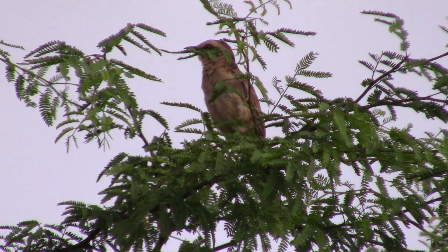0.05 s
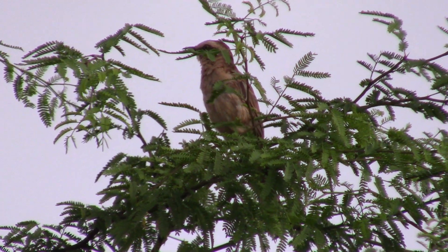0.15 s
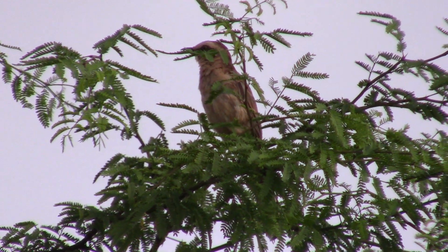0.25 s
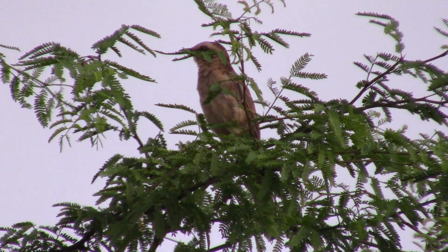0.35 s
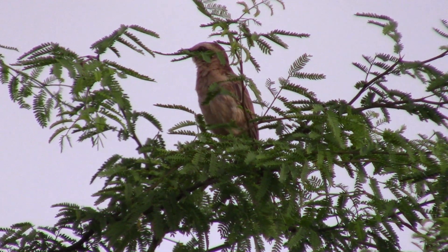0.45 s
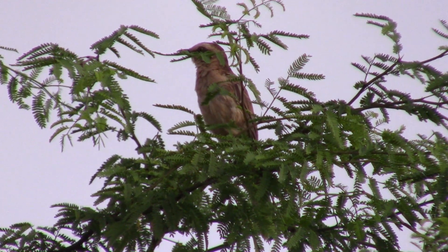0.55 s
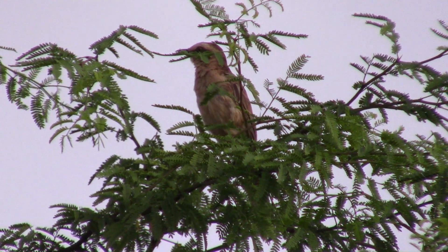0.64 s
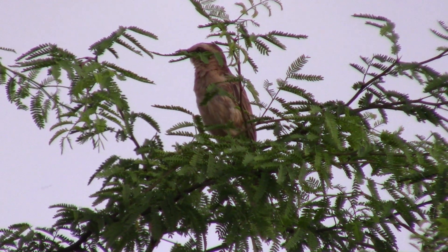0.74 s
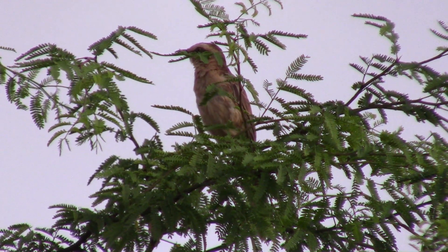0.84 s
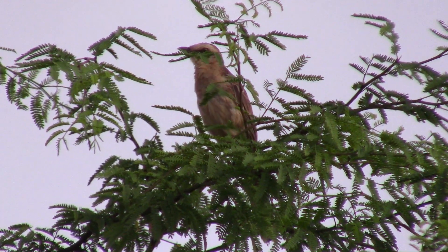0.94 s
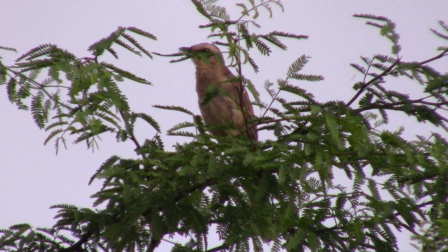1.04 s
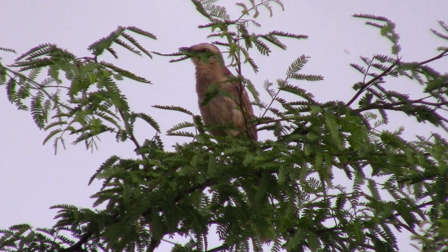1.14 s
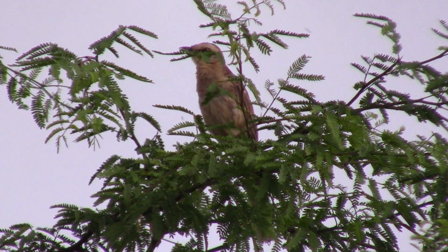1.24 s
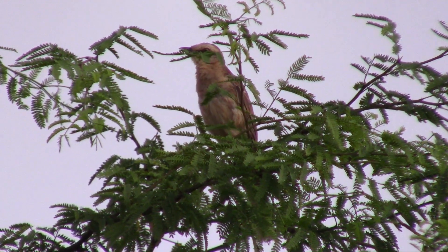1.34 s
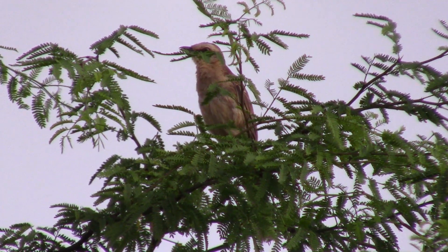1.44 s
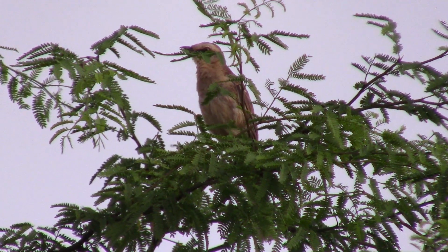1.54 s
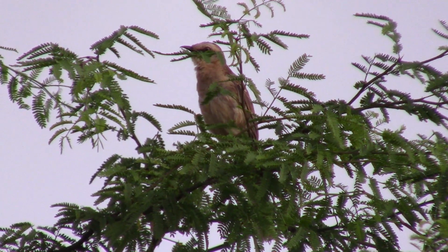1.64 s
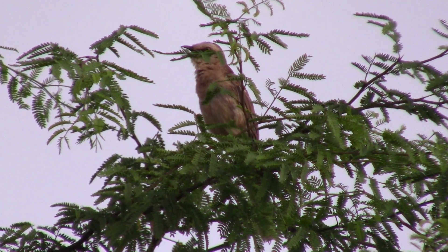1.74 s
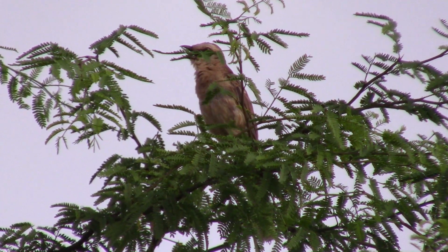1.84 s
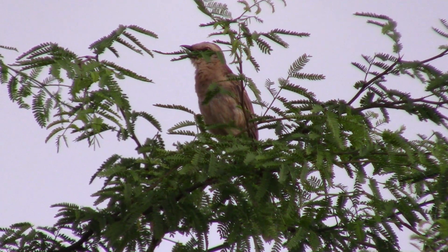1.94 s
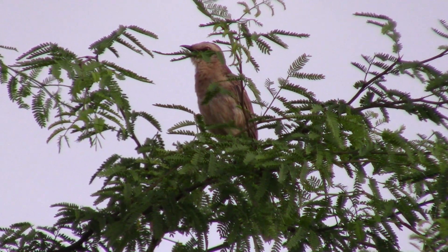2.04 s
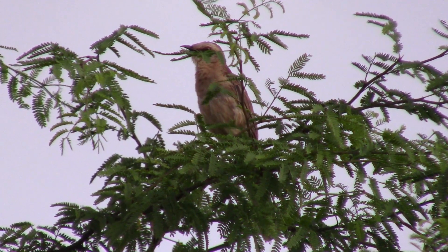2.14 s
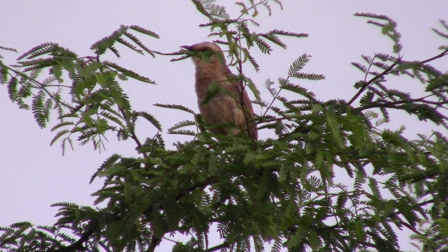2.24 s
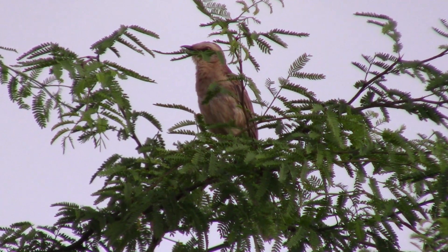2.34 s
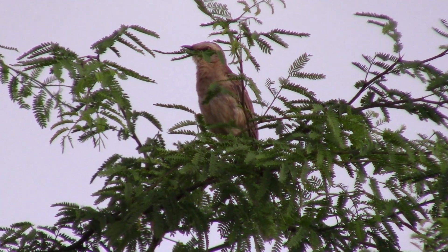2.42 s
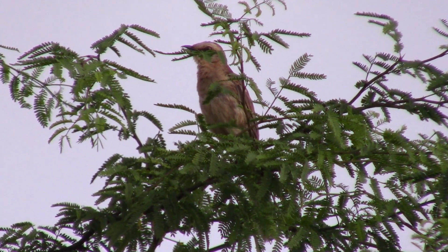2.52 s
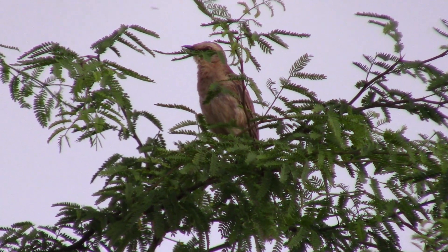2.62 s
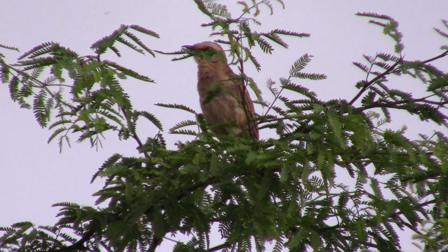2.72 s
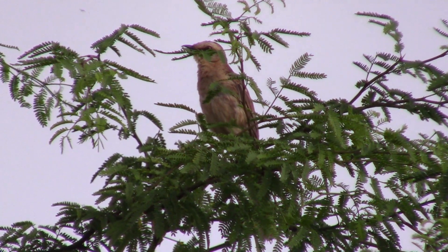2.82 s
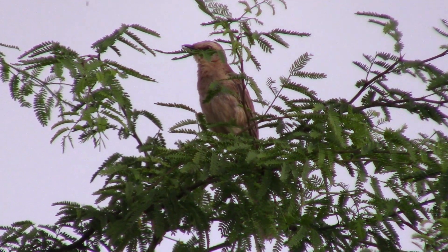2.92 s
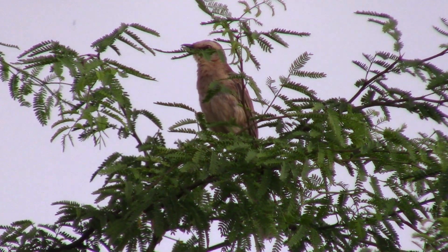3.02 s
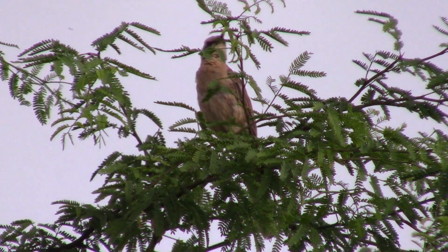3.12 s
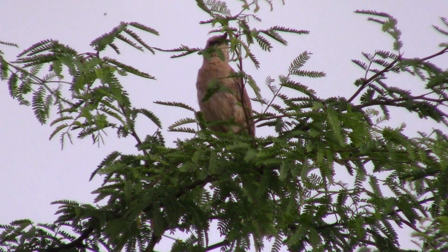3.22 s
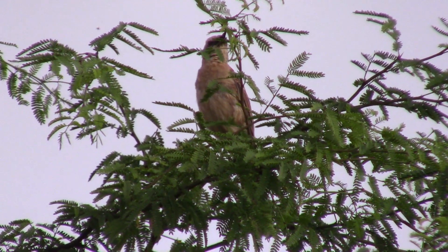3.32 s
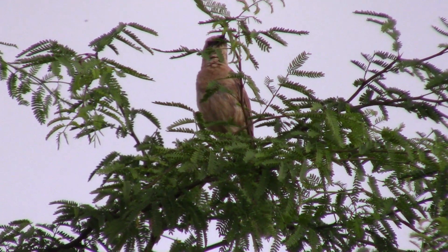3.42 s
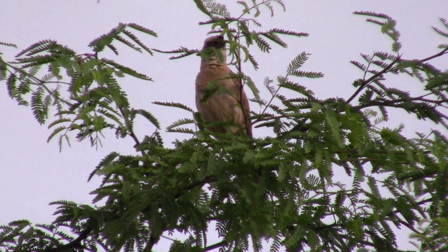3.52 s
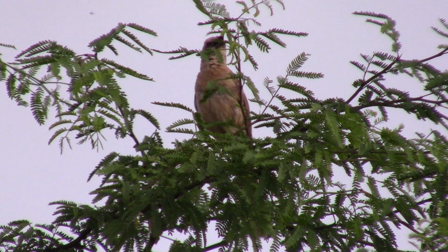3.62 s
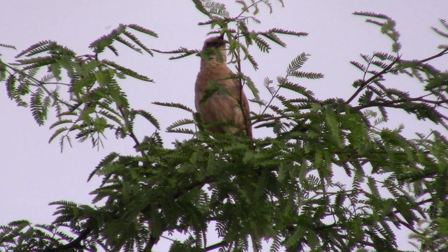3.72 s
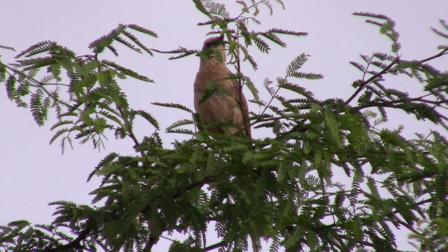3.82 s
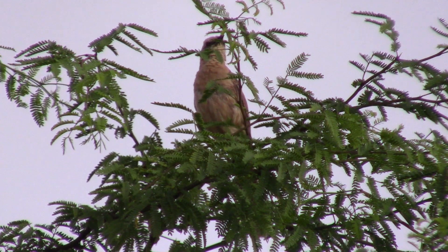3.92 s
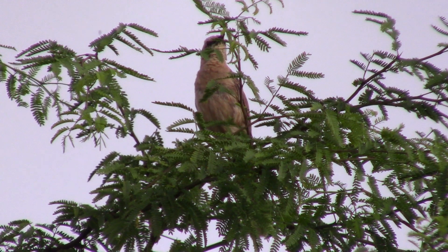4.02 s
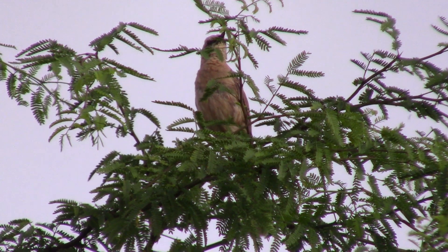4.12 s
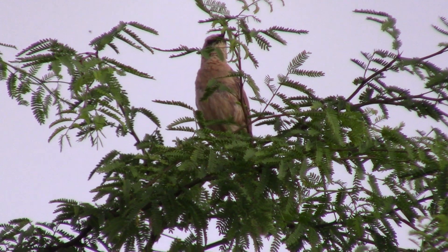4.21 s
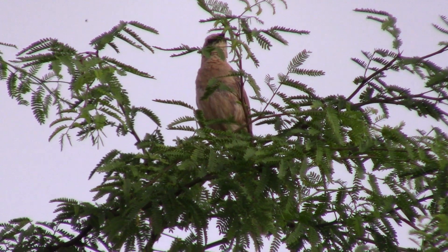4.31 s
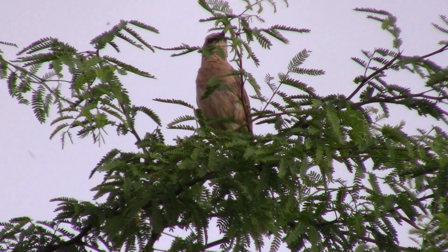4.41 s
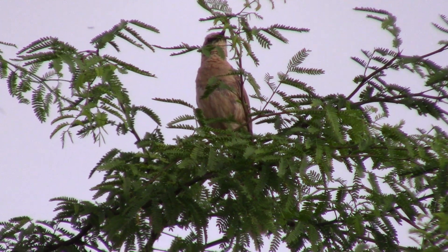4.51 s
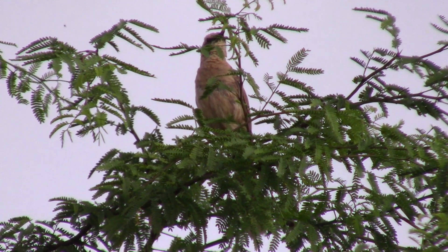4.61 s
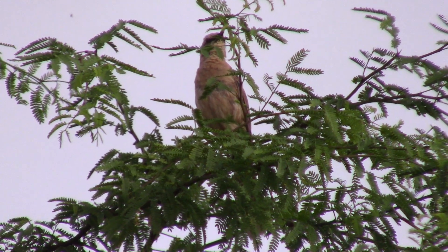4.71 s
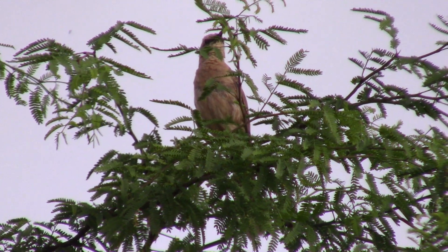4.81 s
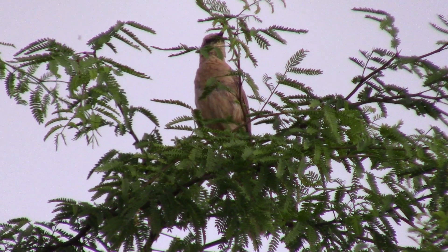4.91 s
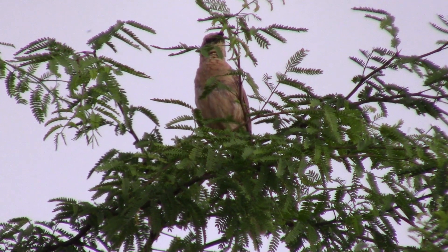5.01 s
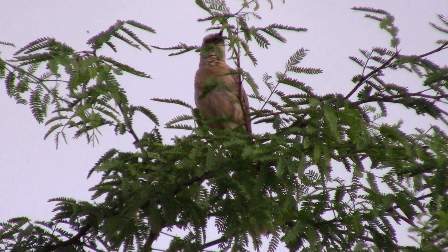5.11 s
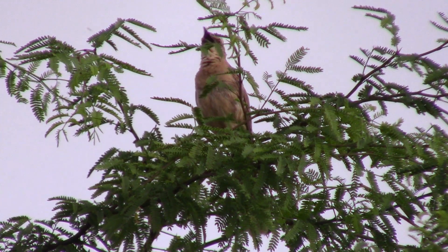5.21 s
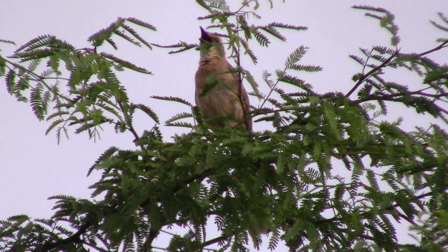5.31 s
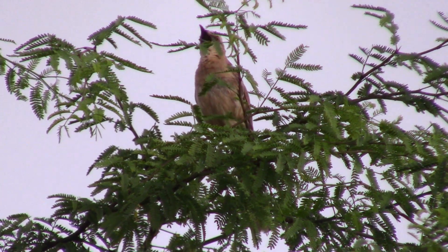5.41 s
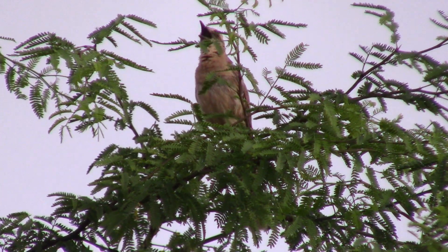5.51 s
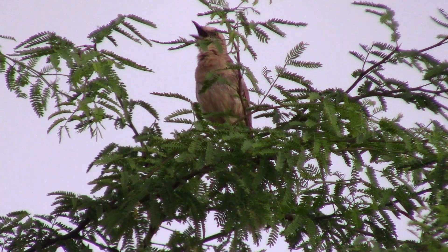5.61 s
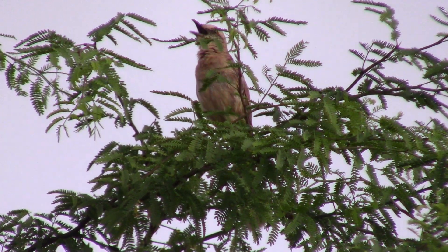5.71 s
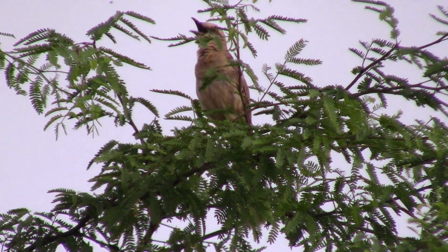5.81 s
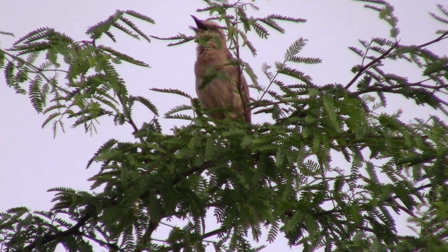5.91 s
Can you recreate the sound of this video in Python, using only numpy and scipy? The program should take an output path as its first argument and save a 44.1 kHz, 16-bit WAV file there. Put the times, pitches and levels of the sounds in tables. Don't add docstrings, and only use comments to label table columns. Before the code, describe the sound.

A songbird close by gives three loud chup-buzz calls with pauses, then breaks into a fast rattle, over faint distant birds, doves and a cricket.

```python
import sys
import numpy as np
from scipy import signal
from scipy.fft import rfft, irfft, next_fast_len
from scipy.io import wavfile
from scipy.ndimage import uniform_filter1d

SR = 44100
rng = np.random.default_rng(int(sys.argv[2]) if len(sys.argv) > 2 else 0)


def boost(x):
    u = np.asarray(x, float) / 20
    return 10 ** u


def output_pcm(signal):
    pcm = np.clip(np.atleast_2d(signal).T, -1, 1) * 32767
    wavfile.write(sys.argv[1], SR, np.round(pcm).astype(np.int16))


N = 262395
T = np.arange(N) / SR

# (frequency [Hz], level per Hz [dB])
AIR_TONE = [(20, -41), (40, -12), (60, -5), (85, -3.5), (125, -3), (250, -0.5), (600, -0.5), (1000, -5),
            (2000, -9), (3500, -9), (5000, -16), (7000, -21.5), (10000, -24.5), (16000, -33.5)]
# (frequency [Hz], side minus middle [dB])
AIR_SIDE = [(30, -12), (300, -8.5), (1500, -10), (6000, -13), (14000, -12)]
AIR_DB = -59.5
# (time [s], pitch [Hz], level [dB])
WIND_PUFFS = [
    (4.411, 111, -65),
    (4.661, 95, -64),
    (4.715, 73, -65),
]

# (from [s], to [s], level [dB], swell [s], fade [s])
RUSTLE = [
    (.9, 1.35, -88, 0.13, 0.072),
    (1.95, 2.1, -80, .1, 0.16),
    (3.17, 3.44, -59, 0.18, 0.028),
    (4.05, 4.15, -77, 0.28, .1),
    (5.28, 5.38, -59.5, 0.083, 0.22),
]
# (from [s], to [s], level [dB], swell [s], fade [s])
CHATTER = [
    (-.1, .05, -73, .1, .2),
    (1.2, 1.3, -63.5, 0.36, 0.24),
    (1.8, 2.0, -75, 0.17, 0.27),
    (3.4, 4.55, -66.5, 0.8, 0.1),
]
# (from [s], to [s], level [dB], swell [s], fade [s])
EARLIER_CALL = [
    (-.1, 0.022, -56, .1, 0.38),
]
RUSTLE_REST_DB, CHATTER_REST_DB = -71, -69

# (from [s], to [s], level [dB], swell [s], fade [s])
CRICKET_BOUTS = [
    (-.1, 1.84, -65.5, 0.094, .06),
    (3.12, 3.18, -81, 0.067, .08),
    (4.6, 6.1, -65.5, .35, .1),
]
CRICKET_HZ, CRICKET_RATE_HZ, CRICKET_DB, CRICKET_REST_DB = 4206, 40.2, -1.5, -108

# (time [s], length [s], from [Hz], to [Hz], level [dB])
GLIDES = [(.259, 0.024, 2420, 2020, -52), (.63, 0.031, 2390, 1820, -52), (1.017, 0.016, 2740, 2000, -43.5),
          (4.197, .032, 2370, 2080, -63), (4.554, 0.019, 2420, 2240, -48),
          (4.828, 0.027, 3030, 2310, -44.5), (5.073, 0.023, 3000, 2240, -42),
          (.766, 0.051, 3500, 3240, -57), (2.277, 0.057, 3450, 3700, -59.5), (2.278, .03, 6700, 7050, -63),
          (2.35, 0.055, 6850, 7000, -75), (2.36, .08, 7500, 7350, -79), (3.793, 0.026, 3870, 3780, -57),
          (.255, 0.025, 5350, 4840, -72), (.312, .025, 5200, 4900, -85), (.098, 0.6, 1306, 1433, -71),
          (.551, 0.6, 1486, 1413, -70.5)]
# (time [s], level [dB])
TSIPS = [
    (2.101, -60),
    (2.155, -60),
    (2.805, -61),
    (2.838, -63),
    (2.875, -62),
    (2.917, -61),
    (2.966, -63),
    (4.09, -67),
    (4.135, -68),
]
# (length [s], from [Hz], to [Hz])
TSIP_SHAPE = (0.0187, 5700, 6450)
# (time [s], pitch [Hz], level [dB])
TICKS = [(.36, 4720, -66), (.672, 5520, -67), (.761, 7800, -66), (.825, 5420, -62), (.974, 4670, -58),
         (2.015, 5810, -66), (2.06, 5770, -63), (2.34, 5200, -70), (2.357, 7500, -66), (2.42, 7550, -68),
         (2.507, 7450, -73), (2.565, 6900, -68), (2.568, 7450, -75), (2.716, 5780, -58.5),
         (2.742, 5770, -64), (2.76, 5900, -63), (2.778, 6200, -66), (2.996, 5960, -60), (3.11, 5840, -74),
         (5.005, 5500, -74), (5.05, 5580, -70)]
TICK_S = 0.016
# (time [s], peak level [dB])
TSEWS = [(0.711, -52), (0.7647, -52), (1.2344, -65), (1.288, -64), (1.4107, -52.5), (1.465, -53.5),
         (2.2043, -52.5), (2.2518, -52.5), (2.412, -65), (2.4596, -60.5), (3.0044, -56), (3.0546, -53.5),
         (3.88, -53), (3.934, -52.5), (4.3021, -65), (4.356, -61), (4.717, -52.5), (4.7697, -53.5),
         (4.894, -61), (4.9442, -62), (5.0858, -68), (5.1398, -68), (5.496, -65), (5.546, -68)]
# (length [s], from [Hz], to [Hz])
TSEW_SHAPE = (0.026, 5470, 5000)
# (time [s], length [s], pitch [Hz], level [dB])
REELS = [
    (1.3, 0.1, 3940, -64.5),
    (2.933, .12, 4000, -65),
    (4.805, 0.088, 4020, -64),
]
# (time from its start [s], pitch [Hz], level [dB])
WARBLE_SHAPE = [
    (-.02, 3187, -8),
    (.001, 4386, 1),
    (.018, 4540, -4),
    (.022, 3800, 4.5),
    (.042, 2950, 3),
    (.062, 3927, -3),
    (.088, 2450, -8),
    (.13, 3580, -17),
    (.165, 2650, -4),
]
# (time [s], level [dB])
WARBLES = [
    (1.107, -55),
    (3.016, -54),
    (4.552, -55),
]
# (time [s], length [s], level [dB], pitch [Hz])
COOS = [
    (2.97, 0.08, -52, 498),
    (3.603, 0.17, -50, 517.5),
    (4.01, 0.11, -51.5, 535.6),
    (4.259, 0.11, -53, 523.7),
    (4.667, 0.21, -50.5, 521.4),
    (5.371, 0.094, -52.5, 506.5),
]
# (time [s], length [s], level [dB], pitch [Hz])
HOOTS = [(0.512, 0.22, -60, 745), (0.771, .22, -61, 735), (.92, 0.058, -57, 640), (1.05, 0.065, -62, 595),
         (1.1, 0.21, -65, 725), (1.26, 0.25, -65.5, 690), (2.36, 0.11, -64, 625), (3.02, 0.11, -63, 630),
         (3.62, 0.11, -61, 630), (3.81, 0.094, -64.5, 735), (4.29, 0.097, -62, 615), (4.54, 0.22, -66, 712),
         (.11, 0.11, -63.5, 1195), (.59, .19, -63, 1185), (.82, .08, -72, 1175), (.95, .07, -64.5, 1180),
         (1.07, 0.069, -64.5, 1180), (1.22, 0.075, -69, 1185), (1.95, .17, -65.5, 1215),
         (2.21, .09, -68, 1170), (2.3, 0.15, -66, 1245), (2.57, 0.072, -63, 1170)]
SCOOP_S, SCOOP_HZ, SCOOP_DB, SAG, FADE_DB = 0.025, 65, -3, .965, -8
AFTER_GAP_S, AFTER_S, AFTER_DB = .012, 0.125, -12

# (time of top pitch [s], top pitch [Hz], level [dB])
CHUPS = [
    (1.785, 2649, -19.5),
    (3.4965, 2630, -20),
    (5.188, 2612, -18.5),
]
CHUP_RISE_S, CHUP_FALL_S, CHUP_LEAD_S = .009, .0042, .042
# (time of top pitch [s], top pitch [Hz], rise [s], voice starts before the top [s], level [dB])
RATTLE = [
    (5.637, 2911, .0055, .0065, -18.5),
    (5.676, 3022, .0045, 0.022, -19.5),
    (5.713, 3076, .004, 0.00615, -19),
    (5.757, 3208, 0.0087, .005, -20),
    (5.801, 3171, 0.01497, .006, -20.5),
    (5.844, 3170, 0.014, .006, -21),
    (5.885, 3184, 0.0154, .006, -20),
    (5.927, 3305, 0.01417, .006, -20),
]
RATTLE_FALL_S, FIRST_FALL_S, SETTLE_S = 0.0081, .015, .08
CHUP_SLACK_HZ, RATTLE_SLACK_HZ = 648, 1057
# (time [s], pitch [Hz], level [dB])
OPENING = [
    (5.561, 1272, -43),
    (5.57, 1387, -24),
    (5.587, 2308, -18.5),
    (5.594, 2635, -18.5),
    (5.601, 2882, -17),
    (5.61, 2548, -15),
    (5.618, 1897, -27.5),
    (5.627, 1584, -17),
]
# (start [s], length [s], top pitch [Hz], top at this share of the length, pointedness)
ARCHES = [
    (1.813, 0.16, 2565, .375, 1.2),
    (3.528, 0.15, 2285, .47, 0.79),
    (5.213, .169, 2288, .37, .8),
]
ARCH_FOOT_HZ, ARCH_DB_PER_OCTAVE, ARCH_ATTACK_S, ARCH_RELEASE_S = 1370, 10, 0.0056, 0.026
# (time of one loud beat [s], rate there [Hz], slowing [Hz per s], level [dB])
FLUTTERS = [
    (1.875, 116.3, 328, -19.5),
    (3.597, 112.4, 239, -19),
    (5.273, 109.7, 324.4, -19.5),
]
FLUTTER_DEPTH, FLUTTER_DB, FLUTTER_LEAD = .082, 5.5, 0.173
SLACK_FLUTTER = 1.5
HARMONIC_DB = [1, -4, -10, -14, -16.5, -20.5, -13, -16, -21.5, -36, -45, -48, -51]
SOFT_DB = 2.6
TURNS_S, ASIDE_SOFT = 3.2, .3
# (frequency [Hz], level [dB])
THROAT = [(800, -63), (1400, -27), (1900, -17.5), (2400, 0.5), (3100, -1.5), (3900, -18), (4800, -28),
          (5800, -24.5), (7000, -18), (8500, -18.5), (9800, -31), (11500, -16), (13300, -31), (15200, -30)]
# (delay [s], level [dB], side from -1 to 1)
ECHOES = [
    (.001, -23.5, -0.27),
    (.0018, -25, 0.53),
    (.0043, -7.5, -0.1),
    (.0061, -16.5, -.2),
    (.0098, -17.5, 0.046),
]
# (delay [s], time to fade 60 dB [s], level [dB])
TAILS = [
    (.008, 0.18, -15),
    (0.03, 0.41, -23),
    (0.163, 1.113, -30.5),
]


def colour(x, points):
    hz, db = np.transpose(points)
    n = next_fast_len(N + SR // 10)
    f = np.arange(n // 2 + 1) * SR / n + 1
    gain = boost(np.interp(np.log(f), np.log(hz), db))
    return irfft(rfft(x, n) * gain, n)[..., :N]


def unit(x):
    return x / np.sqrt(np.mean(x ** 2))


def walk(rate):
    hold = int(SR / rate)
    steps = np.repeat(rng.standard_normal(N // hold + 1), hold)
    smooth = uniform_filter1d(uniform_filter1d(steps, hold), hold)
    return unit(smooth[:N])


def sides(x, pan_db):
    return x * boost(np.array([[pan_db / 2], [-pan_db / 2]]))


def bouts(rows, rest_db):
    gain = boost(rest_db)
    for start, end, db, swell, fade in rows:
        before, after = np.maximum(start - T, 0), np.maximum(T - end, 0)
        gain = gain + boost(db) * np.exp(-before / swell - after / fade)
    return gain


def add_whistle(out, rows, pan_db=0., throb_hz=0.):
    s, hz, db = np.transpose(rows)
    i = slice(int(s[0] * SR), int(s[-1] * SR))
    t = T[i]
    ends = np.clip(np.minimum(t - s[0], s[-1] - t) / min(.006, (s[-1] - s[0]) / 3), 0, 1)
    throb = 1 + 0.55 * np.sin(2 * np.pi * throb_hz * (t - s[0]))
    tone = np.sin(2 * np.pi * np.cumsum(np.interp(t, s, hz)) / SR)
    loudness = np.sqrt(2) * ends * throb * boost(np.interp(t, s, db))
    out[:, i] += sides(loudness * tone, pan_db)


def tail(late, t60, db):
    t = T[:int(1.5 * SR)]
    h = rng.standard_normal((2, len(t))) * boost(-60 * t / t60) * np.clip(t / late - 1, 0, 1)
    h = h[0] + 0.14 * h[1] * np.array([[1], [-1]])
    return h * boost(db) / np.sqrt(np.sum(h ** 2) / 2)


def air():
    mid = colour(rng.standard_normal(N), AIR_TONE)
    side = colour(colour(rng.standard_normal(N), AIR_TONE), AIR_SIDE)
    pair = (mid + side * np.array([[1], [-1]])) / np.sqrt(np.mean(mid ** 2))
    hum = colour(pair, [(350, 12.0), (900, -34)])
    hiss = pair - hum
    hum_swell = boost(0.053 * walk(1.3) + 0.25 * walk(8))
    out = boost(AIR_DB) * (hum * hum_swell + hiss * boost(0.058 * walk(1.8)))
    for s, hz, db in WIND_PUFFS:
        add_whistle(out, [(s - .03, 1.2 * hz, db - 8), (s, hz, db), (s + .04, .8 * hz, db - 10)])
    return out


def leaf_patch(hz, width, db):
    band = [(hz / width ** 2, -70), (hz / width, -8), (hz, 0), (hz * width, -8), (hz * width ** 2, -70)]
    return boost(db + 1.7 * walk(11)) * unit(colour(rng.standard_normal((2, N)), band))


def leaves():
    rustle = leaf_patch(4760, 1.17, -4.5) + leaf_patch(5420, 1.06, -9.5)
    rustle = rustle + leaf_patch(5670, 1.27, -8.5) + leaf_patch(8100, 0.97, -27)
    chatter = leaf_patch(3050, 1.14, -14.0) + leaf_patch(3560, 1.135, -5.5) + leaf_patch(4035, 1.05, -7.5)
    ring = leaf_patch(2700, 1.096, -3.5)
    both = rustle * bouts(RUSTLE, RUSTLE_REST_DB) + chatter * bouts(CHATTER, CHATTER_REST_DB)
    both = both + ring * bouts(EARLIER_CALL, rest_db=-100)
    return both[0] + boost(-9.5) * both[1] * np.array([[1], [-1]])


def cricket():
    beat = np.cumsum(CRICKET_RATE_HZ * (1 + 0.014 * walk(2.9))) / SR % 1
    stroke = np.sin(np.pi * np.clip(beat / 0.86, 0, 1))
    tone = np.sin(2 * np.pi * np.cumsum(CRICKET_HZ * (1 + 0.0058 * walk(60))) / SR)
    loudness = bouts(CRICKET_BOUTS, CRICKET_REST_DB) * boost(CRICKET_DB + 2.5 * walk(15))
    return sides(unit(stroke * tone) * loudness, pan_db=1.5)


def low_call(s, length, db, hz):
    start = (s, hz - SCOOP_HZ, db + SCOOP_DB)
    return np.array([start, (s + SCOOP_S, hz, db), (s + length, SAG * hz, db + FADE_DB)])


def small_birds():
    out = np.zeros((2, N))
    notes = GLIDES + [(s, *TSIP_SHAPE, db) for s, db in TSIPS]
    notes = notes + [(s, TICK_S, hz, .99 * hz, db) for s, hz, db in TICKS]
    for s, length, from_hz, to_hz, db in notes:
        add_whistle(out, [(s, from_hz, db), (s + length, to_hz, db - 8)], pan_db=1.5)
    length, from_hz, to_hz = TSEW_SHAPE
    for s, db in TSEWS:
        middle = (s + .6 * length, .8 * from_hz + .2 * to_hz, db - 3)
        add_whistle(out, [(s, from_hz, db - 4), middle, (s + length, to_hz, db - 8)])
    for s, length, hz, db in REELS:
        add_whistle(out, [(s, hz, db), (s + length, hz, db)], pan_db=-3.5, throb_hz=73.6)
    return out


def doves_and_hoots():
    out = np.zeros((2, N))
    for s, length, db, hz in COOS:
        rows = low_call(s + 0.00286, length, db + 0.34, 1.03 * hz)
        add_whistle(out, rows, pan_db=-1.5)
        add_whistle(out, rows * [1, 2, 1] - [0, 0, 19])
        second = low_call(s + length + AFTER_GAP_S, AFTER_S, db + AFTER_DB, 1.03 * hz)
        add_whistle(out, second, pan_db=-3.0)
    for row in HOOTS:
        add_whistle(out, low_call(*row), pan_db=-2.0)
    return out * boost(4.6 * walk(70) - 1.5)


def far_warbler():
    out = np.zeros((2, N))
    for s, db in WARBLES:
        add_whistle(out, np.array(WARBLE_SHAPE) + [s, 0, db - 3], pan_db=-1.5)
    out = out * boost(3.1 * walk(90))
    return out + signal.fftconvolve(out[:1], tail(0.0043, 0.42, -1.1), axes=1)[:, :N]


def far_birds():
    birds = small_birds() + doves_and_hoots()
    blur = signal.fftconvolve(birds.mean(0)[None], tail(0.0059, 0.2, -9.0), axes=1)[:, :N]
    return birds + blur + far_warbler()


def pushes():
    rows = [(s, CHUP_SLACK_HZ, top, CHUP_RISE_S, CHUP_FALL_S, CHUP_LEAD_S, db) for s, top, db in CHUPS]
    for s, top, rise, lead, db in RATTLE:
        fall = RATTLE_FALL_S + (FIRST_FALL_S - RATTLE_FALL_S) * np.exp((RATTLE[0][0] - s) / SETTLE_S)
        rows.append((s, RATTLE_SLACK_HZ, top, rise, fall, lead, db))
    return rows


def swept_notes(hz, gain, soft):
    push = np.zeros(N)
    for s, slack, top, rise, fall, lead, db in pushes():
        p = 1 / (1 + ((T - s) / np.where(T < s, rise, fall)) ** 2)
        on = (p > push) & (T > s - lead)
        soft[on] = max(1, .02 / lead) * np.clip((s + .006 - T) / .005, 0, 1)[on]
        hz[on] = (slack * (top / slack) ** p)[on]
        push[on] = p[on]
        swell = np.clip((T - s + lead) / min(lead + .002, .022), 0, 1) ** 1.5
        voiced = np.clip((p - np.where(T < s, .035, .06)) / 0.061, 0, 1)
        gain[on] = (boost(db) * swell * voiced * p ** 0.15)[on]


def opening_note(hz, gain):
    s, note_hz, db = np.transpose(OPENING)
    on = (T > s[0]) & (T < s[-1])
    hz[on] = np.interp(T[on], s, note_hz)
    gain[on] = boost(np.interp(T[on], s, db))


def buzzed_arches(hz, gain):
    for (s, length, top, share, pointed), (beat, rate_hz, slowing, top_db) in zip(ARCHES, FLUTTERS):
        on = (T > s) & (T < s + length)
        t = T[on]
        effort = np.sin(np.pi * np.interp(t - s, [0, share * length, length], [0, .5, 1])) ** pointed
        mean_hz = ARCH_FOOT_HZ + (top - ARCH_FOOT_HZ) * effort
        ends = np.clip(np.minimum((t - s) / ARCH_ATTACK_S, (s + length - t) / ARCH_RELEASE_S), 0, 1)
        db = top_db + ARCH_DB_PER_OCTAVE * np.log2(mean_hz / top)
        turn = 2 * np.pi * (rate_hz * (t - beat) - slowing / 2 * (t - beat) ** 2)
        depth = FLUTTER_DEPTH * (1 + SLACK_FLUTTER * (1 - effort))
        hz[on] = mean_hz * np.exp(depth * np.cos(turn + 2 * np.pi * FLUTTER_LEAD))
        flutter_db = FLUTTER_DB * (1 + 0.22 * np.exp((s - t) / 0.0073))
        gain[on] = ends * boost(db + flutter_db * (np.cos(turn) - 1))


def muscles():
    hz, gain, soft = np.full(N, 1000.), np.zeros(N), np.zeros(N)
    swept_notes(hz, gain, soft)
    opening_note(hz, gain)
    buzzed_arches(hz, gain)
    soft = soft + ASIDE_SOFT * (T < TURNS_S)
    return [uniform_filter1d(x, size=40) for x in (hz, gain, soft)]


def songbird():
    hz, gain, soft = muscles()
    phase = 2 * np.pi * np.cumsum(hz * (1 + 0.01414 * walk(600))) / SR
    voice = np.zeros(N)
    for k, db in enumerate(HARMONIC_DB, 1):
        strength = boost(db - SOFT_DB * soft * min(k - 1, 5))
        voice += strength * np.sin(k * phase) * (k * hz < SR / 2.2)
    breath = boost(-21) * rng.standard_normal(N)
    voice = voice * boost(1.2 * walk(300)) + breath
    voice = colour(np.sqrt(2) * gain * voice, THROAT)
    space = sum(tail(*row) for row in TAILS)
    space[:, 0] += boost(np.array([-.42, .42]))
    for late, db, side in ECHOES:
        space[:, int(late * SR)] += boost(db) * (1 + side * np.array([1, -1]))
    return signal.fftconvolve(voice[None], space, axes=1)[:, :N]


def scene():
    return air() + leaves() + cricket() + far_birds() + songbird()


def band_limit(x):
    return signal.sosfilt(signal.butter(12, 15780, fs=SR, output="sos"), x)


def record(dry):
    return band_limit(dry)


dry = scene()
out = record(dry)
output_pcm(out)
```